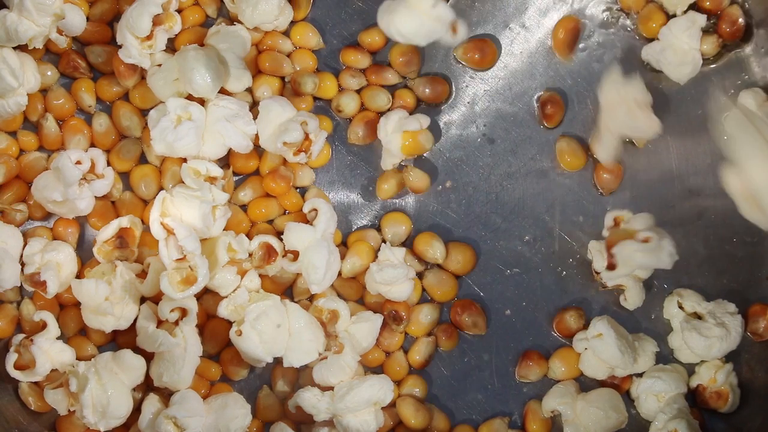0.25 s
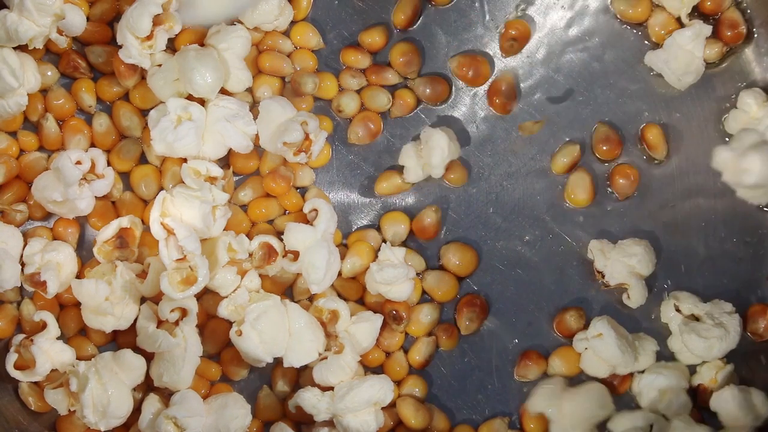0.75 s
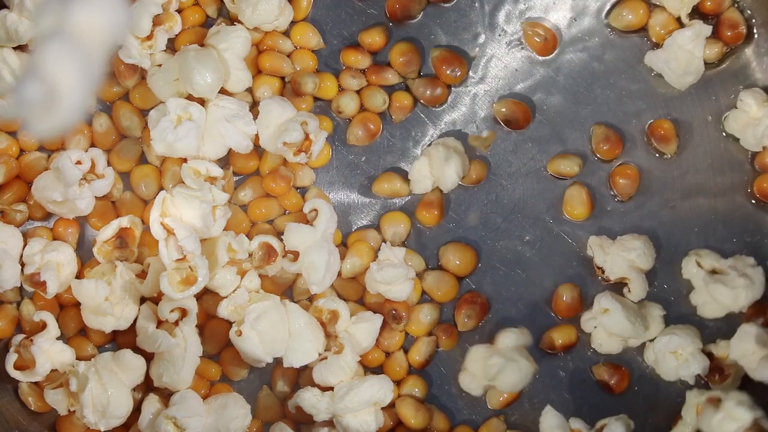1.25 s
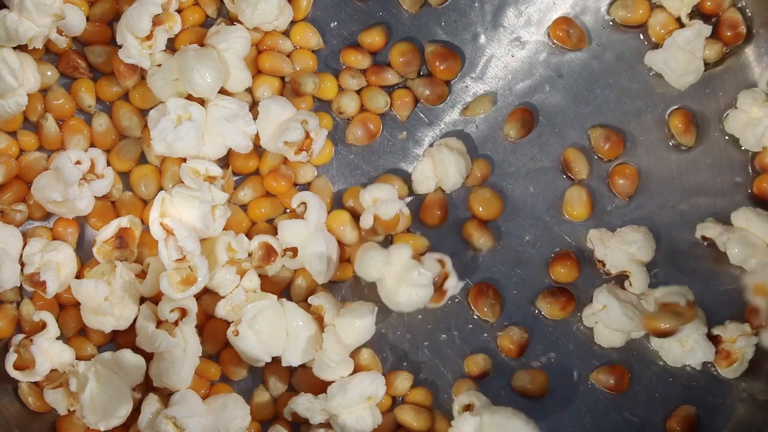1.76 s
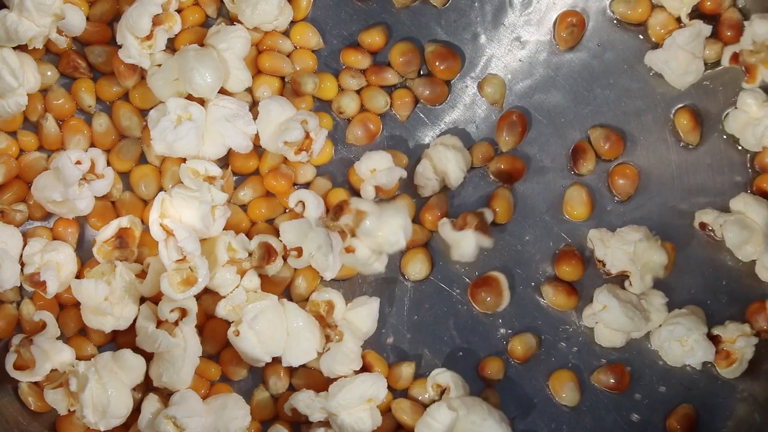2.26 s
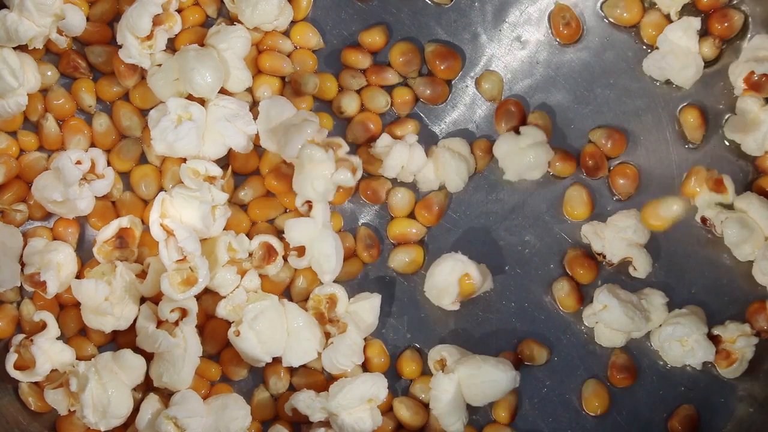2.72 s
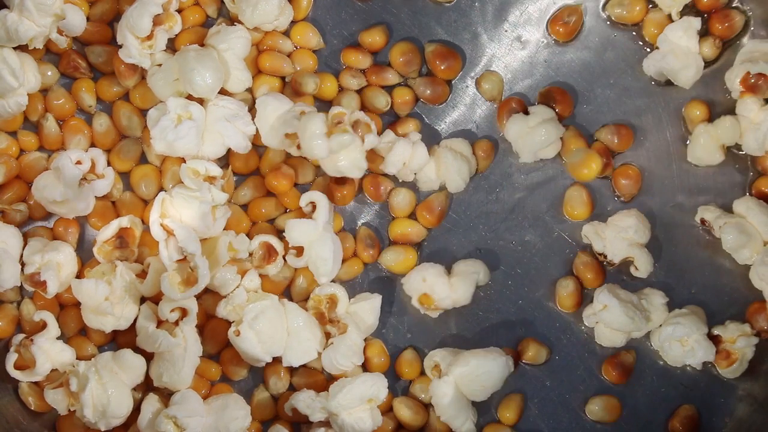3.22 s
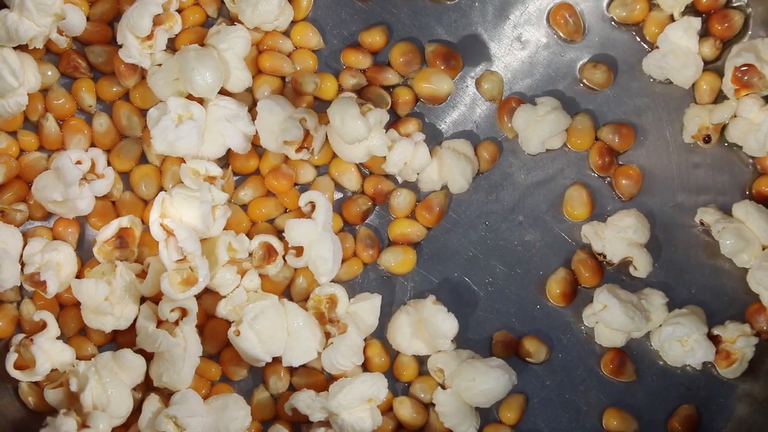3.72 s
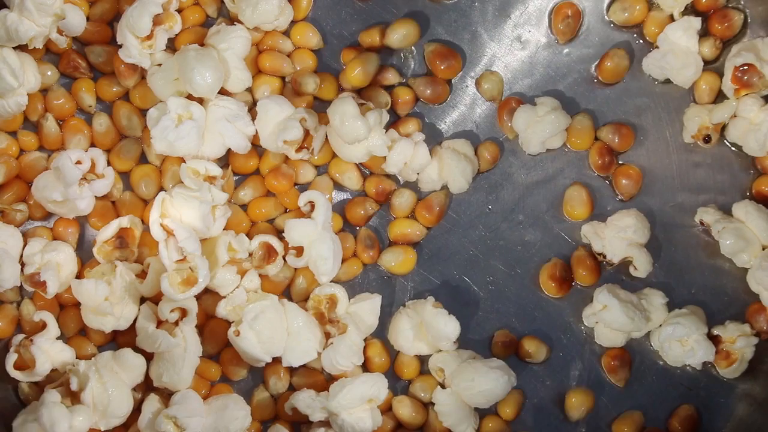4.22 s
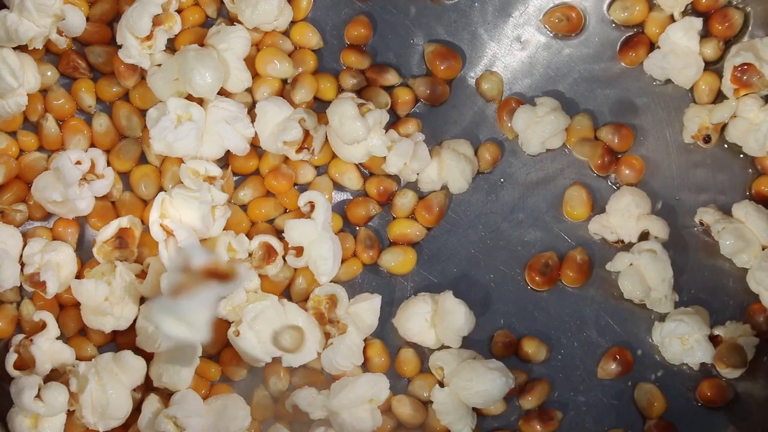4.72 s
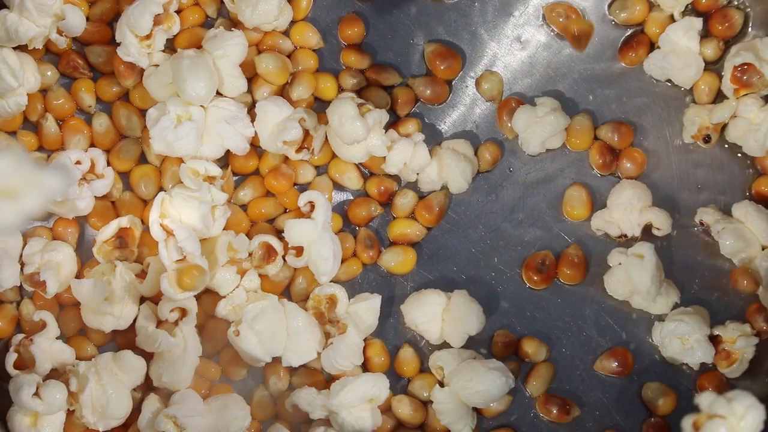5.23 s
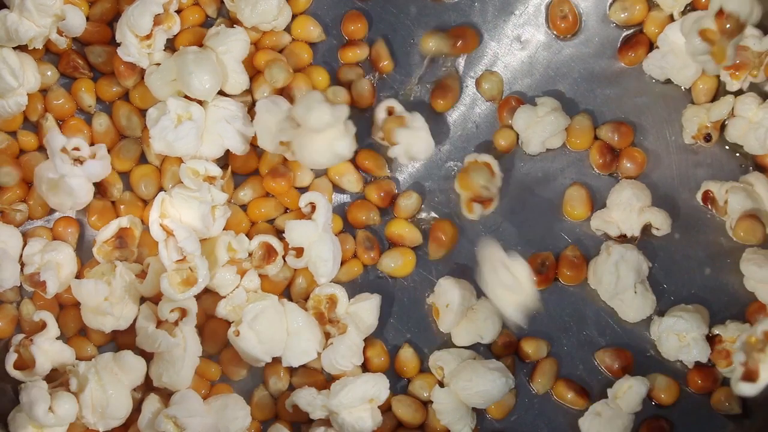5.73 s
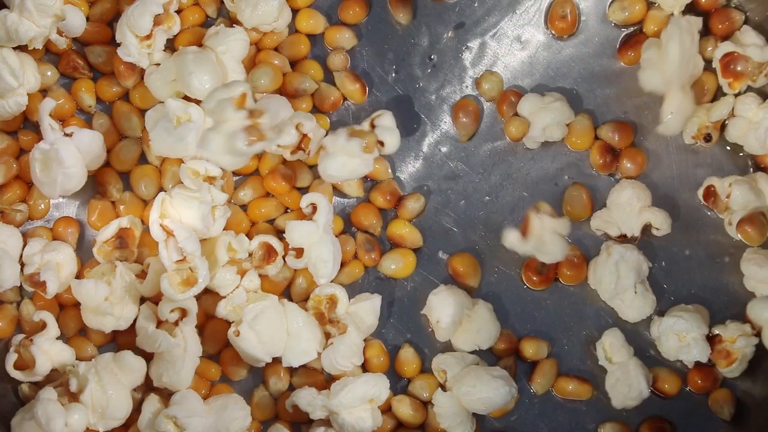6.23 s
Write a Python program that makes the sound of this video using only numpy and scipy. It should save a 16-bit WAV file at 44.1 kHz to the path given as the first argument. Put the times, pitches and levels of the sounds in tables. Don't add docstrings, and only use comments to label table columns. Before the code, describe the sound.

Heavy, dark pops of corn kernels in slow motion, a few overloading, with small taps between them and a soft burner rumble and oil hiss beneath.

```python
import sys
import numpy as np
from scipy import signal
from scipy.fft import rfft, irfft, next_fast_len
from scipy.io import wavfile
from scipy.ndimage import map_coordinates

SR = 44100
rng = np.random.default_rng(int(sys.argv[2]) if len(sys.argv) > 2 else 0)


def boost(x):
    u = np.asarray(x, float) / 20
    return 10 ** u


def waveform_to_disk(signal):
    frames = np.transpose(np.atleast_2d(signal))
    scaled = np.clip(frames, -1, 1) * 32767
    samples = np.round(scaled).astype(np.int16)
    wavfile.write(sys.argv[1], SR, samples)


N = 285327

PORT_LAG_S = 0.00022


# start in seconds, peak
# level in dB, pitch in Hz, far wall echo in dB.
HULL_CRACKS = [(0.0659, 0.5, 260, -2), (0.1485, -14.5, 870, -8), (0.2374, -21, 740, -5),
               (0.3319, -31.5, 610, -10), (0.6266, -32, 480, -11), (0.7642, -41, 670, -10),
               (1.0582, 2, 560, -5), (1.1354, -20.5, 630, -14), (1.3964, -38, 300, 2),
               (1.616, -18.5, 335, -4), (1.703, -29.5, 740, -11), (1.7709, -15, 393, 6.5),
               (2.3413, -7, 240, 5.5), (2.4274, -9, 340, -0.5), (2.4837, -37, 210, -10),
               (2.9236, -31.5, 670, -15), (3.7805, -37, 505, -12), (4.1405, -34, 408, -9),
               (4.3152, -3, 330, 1), (4.3426, 0, 330, -17), (4.437, -22, 460, -20), (4.547, -33, 550, -3),
               (4.7247, -39, 650, -7), (5.845, -11, 800, -12.5), (5.9547, -12, 662, -3),
               (6.0773, 1, 391, 0.5), (6.2166, -36.5, 240, -15), (6.4262, -3.5, 381, -3),
               (.0875, 4, 597, -1.5), (0.0933, -4.5, 330, -10.5), (0.102, -3.5, 824, -9),
              (.1707, -29, 240, 12.5), (1.0725, -1, 630, -9.5), (1.1544, -24, 630, -2.5),
              (2.3542, -13, 240, 9), (4.3492, -0.5, 647, -2), (4.3535, -1, 476, -6.5),
              (4.3669, 0, 900, -15.5), (5.8485, -18.5, 670, 6), (5.8646, -8.5, 933, -2.5),
              (6.0811, 0, 520, -6), (6.0905, 0, 900, -17), (6.435, -6.5, 600, -18)]


def pops():
    out = np.zeros((2, N + SR))
    t = np.arange(SR // 10) / SR
    for s, db, hz, far_db in HULL_CRACKS:
        snap_hz = min(2.4 * hz, 1300)
        snap_start = 0.3 / hz - 0.3 / snap_hz
        snap = dip(np.clip(t - snap_start, 0, 1) * snap_hz)
        crack = dip(t * hz) + 95 / hz * snap
        far_ms = rng.normal(12.9, 0.4)
        add(out, s, boost(db) * filtered(crack, walls(-7, far_db, far_ms)))
    return out[:, :N]


def dip(cycles):
    return -np.sin(2 * np.pi * cycles) * cycles ** 2 * np.exp(-4.2 * cycles) * 46


def walls(near_db, far_db, far_ms):
    near_s = 0.009

    def late(f, s):
        return np.exp(-2j * np.pi * f * s)

    def left(f):
        thin = f / (f + 250) * 1.4
        sharp = 1.8 * f / (f + 500)
        near = boost(near_db) * late(f, near_s)
        far = boost(far_db) * sharp * late(f, far_ms / 1000)
        return late(f, PORT_LAG_S) + thin * (near - far)

    return lambda f: np.array([left(f), 1 + 0 * f])


# start in seconds, length in seconds, level in dB, centre in Hz, width in Hz.
STEAM_JETS = [
    (0.08, 0.016, -10.5, 900, 1300),
    (1.703, .06, -37, 695, 600),
    (4.355, 0.006, -12, 950, 700),
    (5.847, 0.035, -27.5, 790, 530),
    (6.329, .085, -23, 530, 440),
    (6.423, 0.019, -18, 700, 490),
    (5.17, 0.45, -54, 743, 50),
    (2.7, 1.45, -53, 280, 15),
]


def steam():
    out = np.zeros((2, N + SR))
    for s, length, db, hz, width_hz in STEAM_JETS:
        t = np.arange(round((length + 0.25) * SR)) / SR
        noise = rng.standard_normal(len(t))
        jet = unit(filtered(noise, lambda f: resonance(f, hz, width_hz) ** 3))
        jet = unit(jet * boost(1.9 * wobble(150)[:len(t)]))
        attack = np.clip(t / (0.013 * length + 0.00036), 0, 1)
        decay_db = -6 * t / length - 230 * np.clip(t - length, 0, 1) - 15 * (t > length)
        add(out, s, boost(db) * filtered(jet * attack * boost(decay_db), walls(-14, 4, 12.4)))
    return out[:, :N]


# frequency in Hz, level in dB, 60 dB decay time in seconds.
PAN_MODES = [(124, -6, .4), (231, -5, .4), (314, -1, .33), (415, -2, .33), (495, -6, .3), (587, -5, .3),
             (689, -5, .25), (861, -9, .25)]


def thumps():
    out = np.zeros((2, N + SR))
    t = np.arange(SR // 2) / SR
    sides_db = 1.5 * np.array([[0.5], [-0.5]])
    right = np.array([[0], [1]])
    cycles = 50.8 * t + 0.25 * (1 - np.exp(-t / 0.0045))
    flexing = -np.sin(2 * np.pi * cycles) * (1 - np.exp(-t / 0.0044))
    for s, db, ring_db, room_db, room_hz in contacts():
        thump = boost(db + sides_db - 60 * t / 0.19) * flexing
        ring = 0
        for hz, level, t60 in PAN_MODES:
            mode_db = level + rng.normal(0, 2.1) + along(PORT_SHADE, hz) * right - 60 * t / t60
            phase = rng.uniform(0, 2 * np.pi, (2, 1))
            ring = ring + boost(mode_db) * np.sin(2 * np.pi * hz * t + phase)
        ring = boost(ring_db) * ring * (1 - np.exp(-t / 0.03))
        add(out, s, thump + ring + boost(room_db) * reverberation(room_hz, t))
    return out[:, :N]


# start in seconds, thump level in dB, ring level in dB,
# reverberation level in dB, reverberation pitch in Hz.
HEAVY_BLOWS = [(.066, -13, -22, -17, 400), (.088, -22, -24.5, -18, 800), (1.058, -31.5, -35.5, -19, 600),
               (1.073, -39.5, -36, -24, 700), (1.615, -41, -35, -31.5, 400), (1.768, -35, -28, -28.5, 408),
               (2.34, -17.5, -23.5, -21, 359), (2.356, -27, -33, -29, 420), (2.427, -26, -29, -23, 450),
               (4.315, -29.5, -22.5, -20, 393), (4.343, -25.5, -23.5, -13.5, 624),
               (4.368, -39, -36.5, -27.5, 790), (5.845, -42, -38, -25, 810), (5.865, -42.5, -35, -28, 648),
               (5.953, -36, -33, -30, 560), (6.419, -3, -31.5, -19.5, 701), (6.076, -22, -14, -23, 480)]
# start in seconds, reverberation level in dB, its pitch in Hz.
LIGHT_TAPS = [(.149, -30.5, 800), (.172, -34, 503), (.333, -46, 500), (0.627, -49, 595), (1.136, -35, 686),
              (1.396, -49.5, 389), (2.485, -36.5, 690), (2.924, -59, 690), (4.141, -44, 497),
              (4.547, -51.5, 596), (6.215, -43.5, 495)]


def contacts():
    thump_db, ring_db = -7, -1
    taps = [(s, db + thump_db, db + ring_db, db, hz) for s, db, hz in LIGHT_TAPS]
    return HEAVY_BLOWS + taps


# frequency in Hz, level in dB per Hz.
ECHO_COLOUR = [(35, -41.5), (60, -14.5), (167, -10), (321, 1.5), (461, -10), (870, -5), (949, -11.5),
               (1900, -15.5), (2470, -49.5), (4180, -120)]
# frequency in Hz, 60 dB decay time in seconds.
KITCHEN_DECAY = [(40, 0.45), (110, 0.28), (280, 0.13), (740, 0.22), (1900, 0.1)]
# frequency in Hz, level in dB.
PORT_SHADE = [(100, 0), (300, -4.5), (1000, -6), (1900, -3)]


def reverberation(pitch_hz, t):
    knots = np.mgrid[:2, :len(t)] * [[[1]], [[400 / SR]]]
    uneven_db = 4.5 * map_coordinates(rng.standard_normal((2, 250)), knots)
    spikes = rng.standard_normal((2, len(t))) * boost(uneven_db)
    spikes[1] = 0.15 * np.roll(spikes[0], -round(PORT_LAG_S * SR)) + 0.93 * spikes[1]
    hz, frame, z = signal.stft(spikes, SR, nperseg=512)
    tilt = ((hz + 50) / 550) ** (0.87 * np.log(pitch_hz / 550))
    colour = boost(along(ECHO_COLOUR, hz) + [[0], [1]] * along(PORT_SHADE, hz)) * tilt
    decay = boost(-60 * frame / along(KITCHEN_DECAY, hz)[:, None])
    echoes = signal.istft(z * colour[..., None] * decay, SR, nperseg=512)[1][:, :len(t)]
    build = 0.25 * np.clip(t / 0.003, 0, 1) + 0.75 * np.clip((t - 0.009) / 0.008, 0, 1)
    return build * echoes / np.sqrt(np.mean(echoes[0, 800:2600] ** 2))


# time in
# seconds, level in dB.
FLAME_LEVEL = [(0.0, -35.5), (0.07, -43.5), (0.21, -65), (0.54, -59.5), (0.97, -54), (1.42, -59),
               (1.67, -47.5), (1.96, -54.5), (3.46, -43), (4.05, -45.5), (4.29, -47), (4.63, -54.5),
               (5.84, -44.5), (5.98, -37.5), (6.16, -55.5), (6.47, -49.5)]
# time in seconds, level in dB.
OIL_LEVEL = [(0, -45), (.4, -52), (.9, -54.5), (1.3, -50), (1.45, -54), (2.3, -53.5), (2.65, -46.5),
             (3.0, -45.5), (4.1, -47), (4.3, -44.5), (4.7, -54), (5.03, -50.5), (5.35, -47), (5.85, -46.5),
             (6.3, -47), (6.47, -48)]
# frequency in Hz, level in dB per Hz.
RUMBLE_COLOUR = [(10, -35), (20, 3), (40, -5.5), (90, -15.5), (140, -27), (300, -120)]
# frequency in Hz, width in Hz, level in dB.
DRONE_BANDS = [(122, 40, -3), (176, 53, -2), (300, 105, -8)]
# frequency in Hz, level in dB per Hz.
SIZZLE_COLOUR = [(80, -25), (200, 1), (400, -0.5), (650, 2), (900, -2), (1300, -9), (1700, -12),
                 (2000, -18)]


def stove():
    oil_db = curve(OIL_LEVEL)
    stirred = splashes()

    def follow(db, grows):
        steady_db = db + oil_db.mean() + grows * (oil_db - oil_db.mean())
        return np.hypot(boost(steady_db), boost(db) * stirred)

    low = rng.standard_normal(N) + 0.3 * rng.standard_normal((2, N))
    rumble = unit(filtered(low, lambda f: boost(along(RUMBLE_COLOUR, f))))
    rumble = rumble * boost(curve(FLAME_LEVEL) + 3.3 + 2.1 * wobble(3.6))

    def drone_response(f):
        return sum(boost(db) * resonance(f, hz, width_hz) ** 2 for hz, width_hz, db in DRONE_BANDS)

    drone = unit(filtered(rng.standard_normal((2, N)), drone_response))
    drone = drone * follow(-2, 1.72) * boost(-3.5 + 3.5 * wobble(3.1))

    spits = boost(1.1 * np.array([wobble(250), wobble(250)]) + 1.2 * wobble(12))
    sizzle = filtered(rng.standard_normal((2, N)) * spits, lambda f: boost(along(SIZZLE_COLOUR, f)))
    sizzle = unit(sizzle) * follow(-1.5, 0.86)

    sides = boost([[5.2], [-0.3]])
    return rumble + sides * (drone + sizzle)


def splashes():
    level_db, t60_s, rise_s = -21, 0.77, 0.04
    power = np.zeros((1, N + SR))
    t = np.arange(SR) / SR
    for s, _, _, room_db, _ in contacts():
        swell = boost(room_db + level_db - 60 * t / t60_s) * (1 - np.exp(-t / rise_s))
        add(power, s, swell[None] ** 2)
    return np.sqrt(power[0, :N])


def unit(x):
    return x / np.sqrt(np.mean(x ** 2) + 1e-20)


def along(points, hz):
    f, v = np.transpose(points)
    return np.interp(np.log(hz + 1), np.log(f + 1), v)


def curve(rows):
    return np.interp(np.arange(N) / SR, *np.transpose(rows))


def wobble(rate):
    knots = rng.standard_normal(int(N * rate / SR) + 4)
    return map_coordinates(knots, [np.arange(N) * rate / SR])


def filtered(x, response):
    m = next_fast_len(x.shape[-1] + 8192)
    spectrum = rfft(x, m) * response(np.fft.rfftfreq(m, 1 / SR))
    return irfft(spectrum, m)[..., :x.shape[-1]]


def resonance(f, hz, width_hz):
    return 1j * f * width_hz / (hz * hz - f * f + 1j * f * width_hz + 1e-9)


def add(track, s, sound):
    start = round(s * SR)
    track[:, start:start + sound.shape[1]] += sound


def scene():
    return pops() + steam() + thumps() + stove()


def roll_off(x):
    return signal.sosfilt(signal.butter(12, 20000, fs=SR, output="sos"), x)


def record(dry):
    top_hz, spill_hz = 1900, 2400

    def edge(hz, top):
        return 1 / (1 + np.exp(np.clip((hz - top) / 14, -50, 50)))

    overloaded = np.clip(dry, -1.02, 1.02)
    slowed = filtered(overloaded, lambda hz: edge(hz, top_hz))
    spill = boost(-41) * dry + boost(-9) * (overloaded - dry)
    slowed += filtered(spill, lambda hz: edge(hz, spill_hz) - edge(hz, top_hz))
    hiss = boost(-95.3) * filtered(rng.standard_normal((2, N)), lambda hz: hz < 16000)
    return roll_off(np.clip(slowed, -1, 1) + hiss)


dry = scene()
out = record(dry)
waveform_to_disk(out)
```